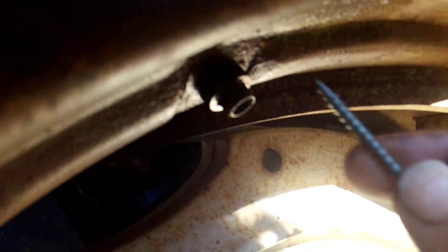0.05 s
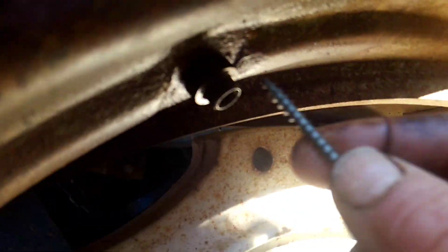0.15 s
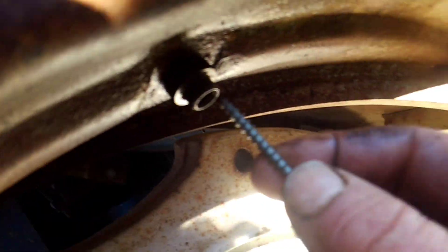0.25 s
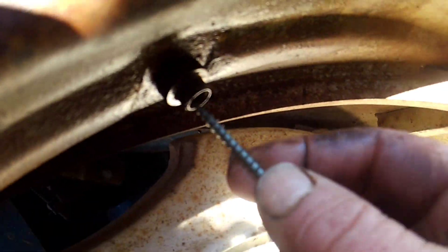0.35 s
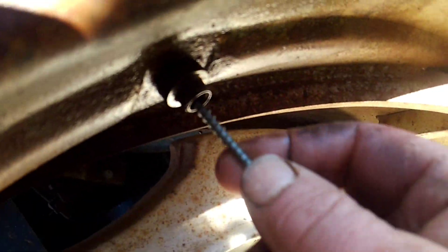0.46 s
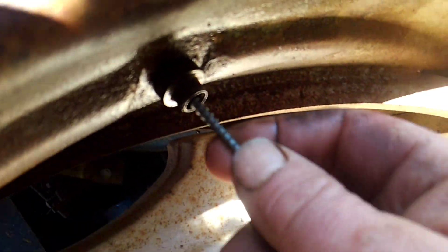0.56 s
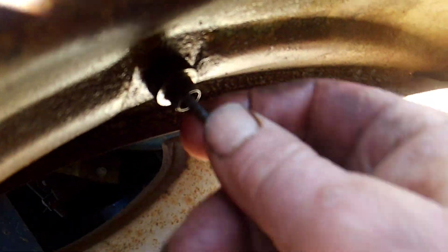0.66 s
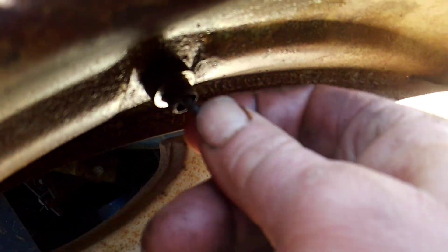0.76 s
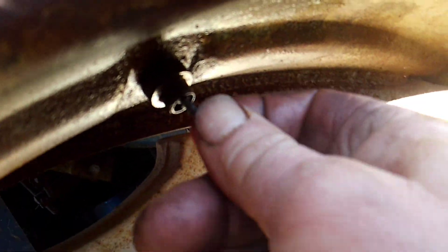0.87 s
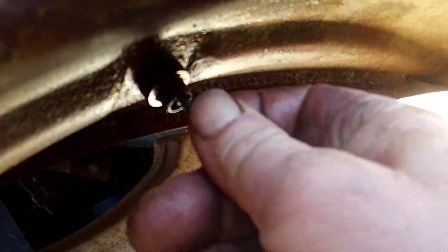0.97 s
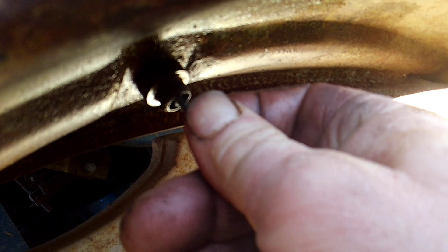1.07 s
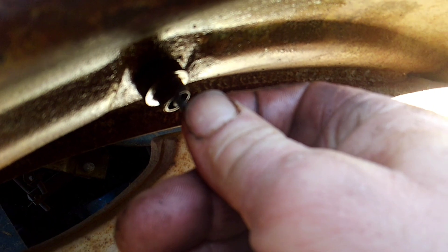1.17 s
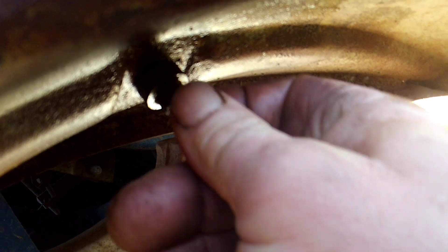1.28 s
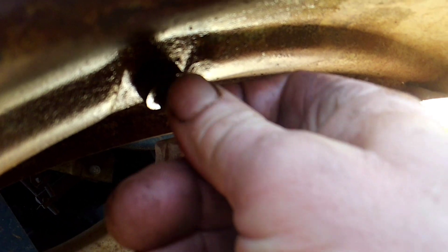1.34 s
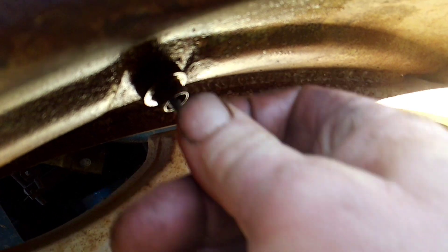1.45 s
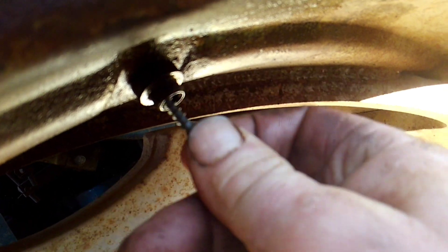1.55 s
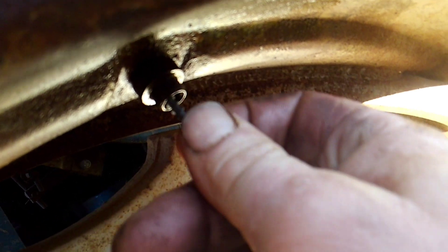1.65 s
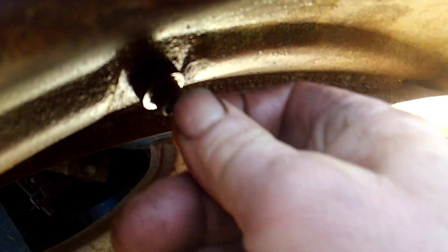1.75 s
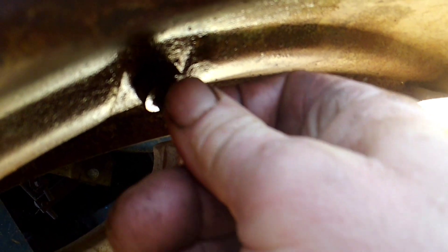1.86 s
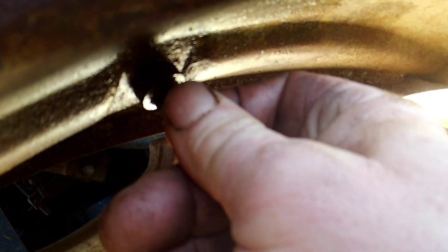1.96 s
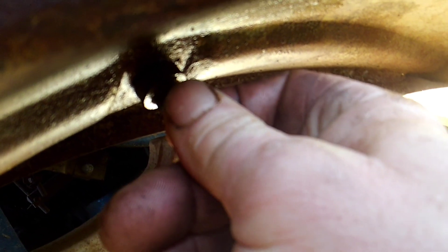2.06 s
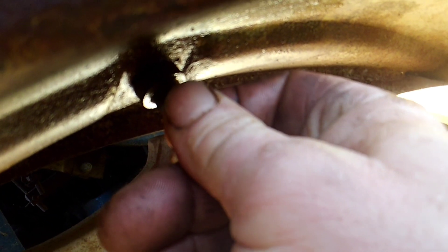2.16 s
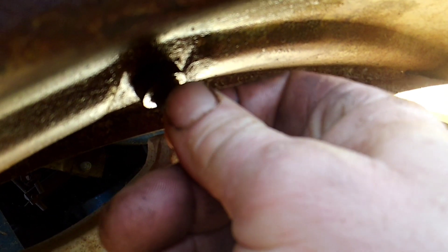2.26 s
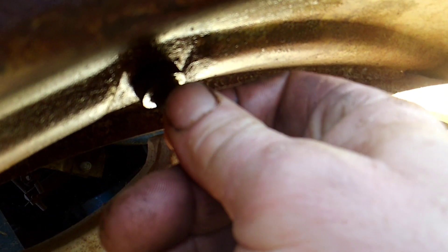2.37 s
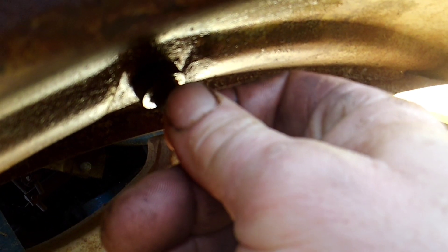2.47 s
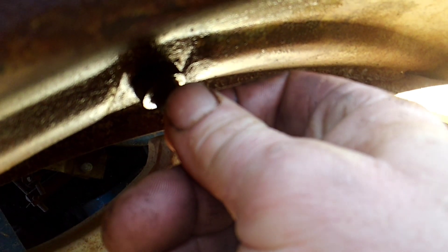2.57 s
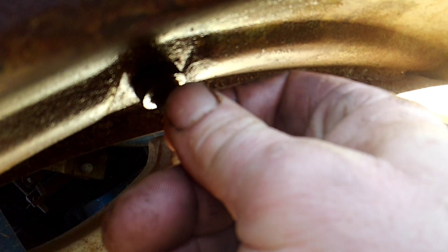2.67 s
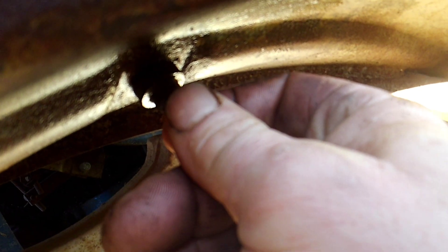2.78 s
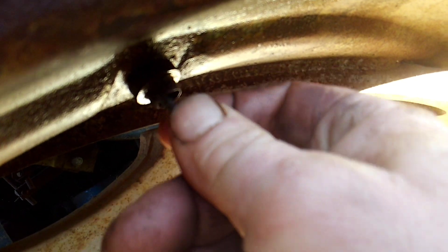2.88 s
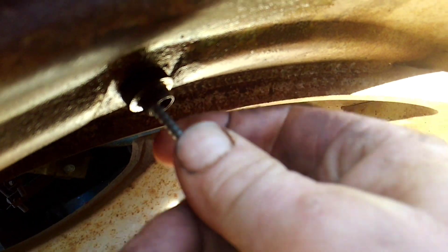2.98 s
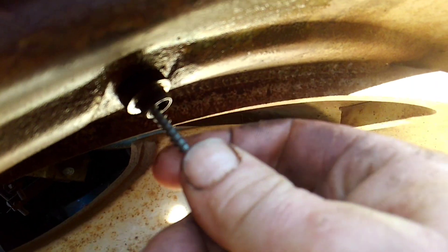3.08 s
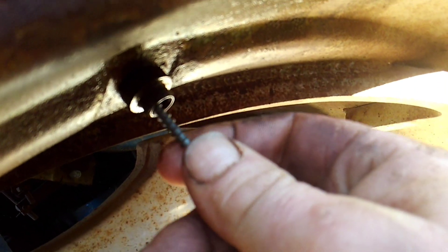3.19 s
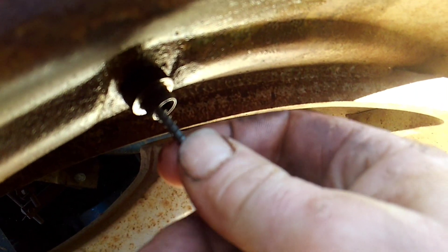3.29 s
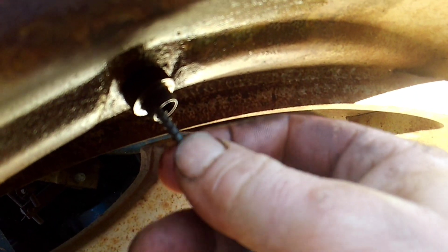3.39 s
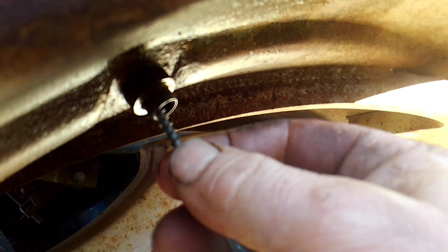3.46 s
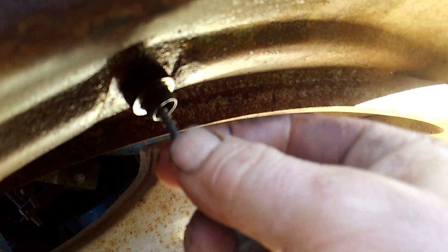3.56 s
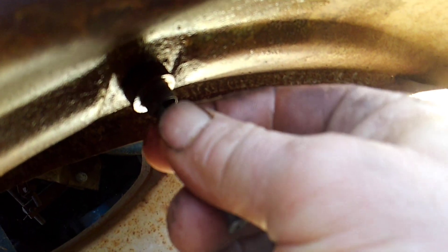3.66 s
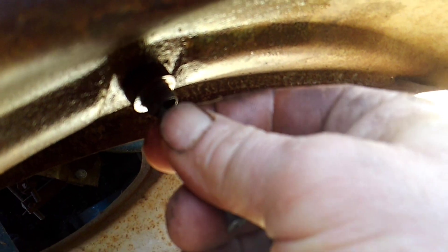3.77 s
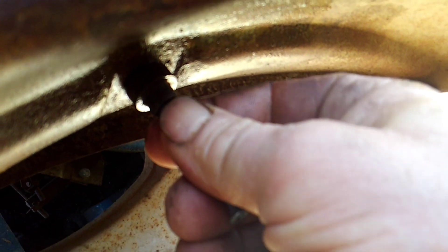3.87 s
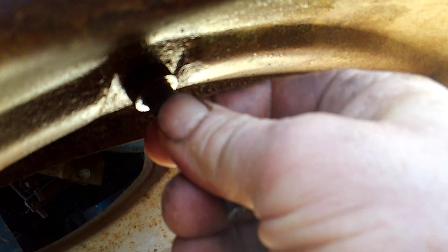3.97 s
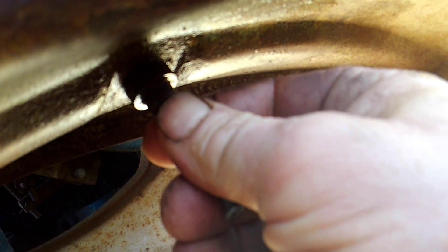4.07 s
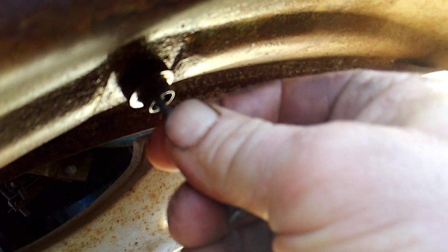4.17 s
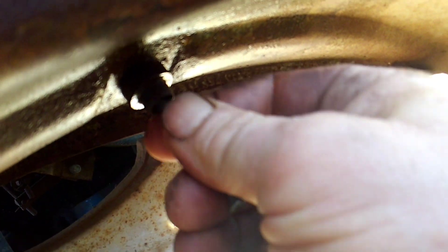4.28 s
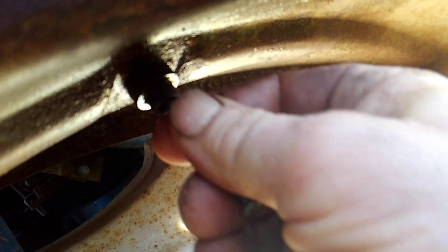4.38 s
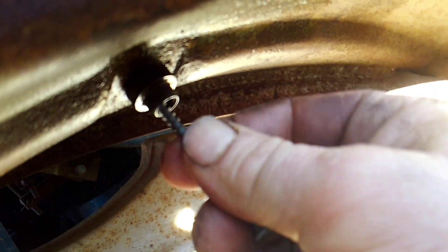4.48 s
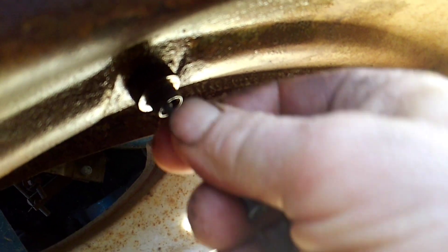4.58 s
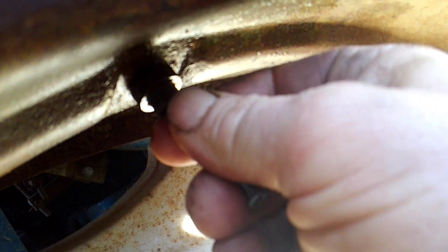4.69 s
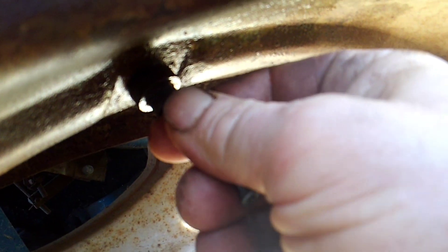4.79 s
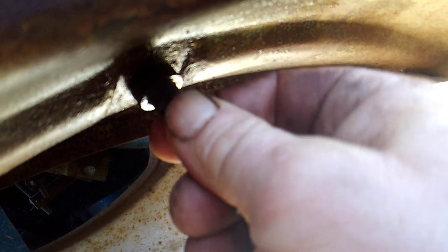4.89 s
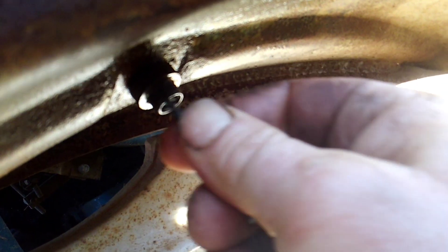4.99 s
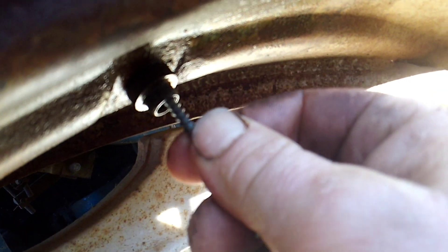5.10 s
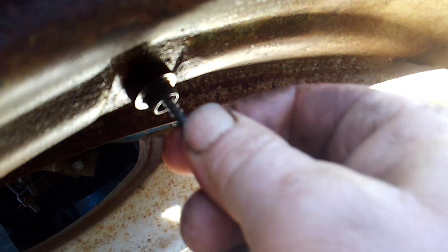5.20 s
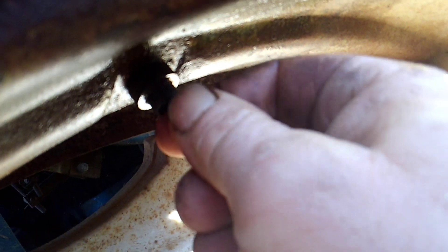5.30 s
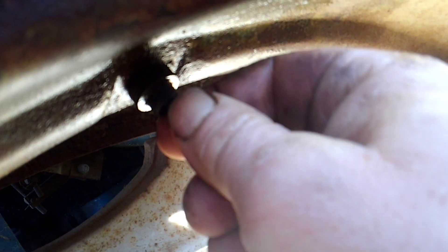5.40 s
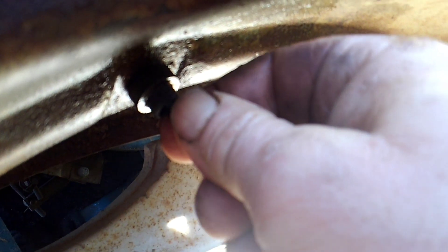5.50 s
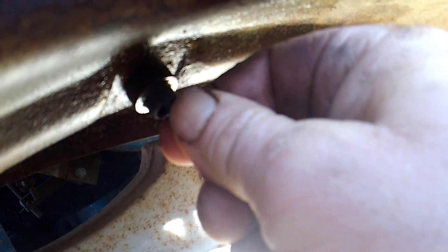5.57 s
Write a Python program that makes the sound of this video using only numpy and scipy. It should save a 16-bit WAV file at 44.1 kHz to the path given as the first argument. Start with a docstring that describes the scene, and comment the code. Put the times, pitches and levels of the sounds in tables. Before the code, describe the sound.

A faint tyre-valve leak hisses, a screw ticks on the stem, then six bursts of pressurised air blast out, the first two squealing.

```python
"""A faint steady leak hisses over low wind rumble; a screw ticks on a tyre valve's stem, then air bursts out.
Six presses of the pin release turbulent jets, synthesized as noise shaped by the stem's resonances.
In the first two the wide-open seal flutters, an unsteady, finally falling squeal of six harmonic partials.
Ticks are impulses through resonators, gusts are decaying swings, and a late faint chirp is a gliding sine.
A single microphone hears it all, so both channels are alike."""
import sys
import numpy as np
from scipy import signal
from scipy.fft import rfft, irfft, next_fast_len
from scipy.io import wavfile

SR = 44100
rng = np.random.default_rng(int(sys.argv[2]) if len(sys.argv) > 2 else 0)


def generate_wav(signal):
    """Clip the signal to [-1, 1] and save it as 16-bit WAV at the path in sys.argv[1]."""
    frames = np.transpose(np.atleast_2d(signal))
    scaled = np.clip(frames, -1, 1) * 32767
    pcm = np.round(scaled).astype(np.int16)
    wavfile.write(sys.argv[1], SR, pcm)


def gain_from_decibels(decibels):
    """Convert decibel values to linear amplitude factors."""
    exponent = np.asarray(decibels, float) / 20
    return 10 ** exponent


N = 248724
FFT_SIZE = next_fast_len(N)
HZ = np.maximum(np.fft.rfftfreq(FFT_SIZE, 1 / SR), 1)

# Presses of the pin: starts to open t/s, starts to shut t/s, rise/s, fall/s
PRESS_TIMES = [(0.708, 1.453, 0.029, 0.005), (1.627, 2.851, 0.032, 0.011), (3.622, 4.094, 0.0071, 0.041),
               (4.24, 4.383, .012, 0.013), (4.578, 4.94, 0.009, 0.041), (5.241, 5.7, 0.0097, .01)]
# Borders between the five spectral regions of jet and leak: f/Hz
REGION_EDGES_HZ = [2800, 4300, 7300, 9700]


def rms_one(x):
    """Normalization: scales a signal to unit root mean square."""
    return x / np.sqrt(np.mean(x ** 2) + 1e-20)


def in_time(rows):
    """Linear interpolation: table columns at every sample, and a gate open from first to last row."""
    s, *columns = np.transpose(rows)
    t = np.arange(N) / SR
    gate = np.clip(np.minimum(t - s[0], s[-1] - t) / 0.004, 0, 1)
    return [np.interp(t, s, column) for column in columns], gate


def spectral_density(points):
    """Spectral envelope: power per Hz, joined in dB over log frequency."""
    hz, db = np.transpose(points)
    return gain_from_decibels(2 * np.interp(np.log(HZ), np.log(hz), db))


def resonance_density(peaks):
    """Resonance: each mode passes a Lorentzian peak of power per Hz."""
    return sum(gain_from_decibels(2 * db) / (1 + (2 * (HZ - hz) / width) ** 2) for hz, width, db in peaks)


def hiss(density):
    """Filtered noise: white noise weighted to a given power per Hz, then brought to unit rms."""
    white = rfft(rng.standard_normal(FFT_SIZE))
    return rms_one(irfft(white * np.sqrt(density), FFT_SIZE)[:N])


def drift(rate_hz):
    """Low-pass random fluctuation: slow noise of unit rms, drawn at every 16th sample."""
    step = 16
    size = next_fast_len(N // step + 2)
    hz = np.fft.rfftfreq(size, step / SR)
    slow = irfft(rfft(rng.standard_normal(size)) / (1 + (hz / rate_hz) ** 2), size)
    return np.interp(np.arange(N) / step, np.arange(size), rms_one(slow))


def jet(beat, flow, pop):
    """Turbulent jet noise: broadband eddies excite the stem, whose rings swell and fade as the pin moves."""
    # Stem colour for five positions of the screw: f/Hz, relative level/dB per Hz
    jet_colours = [
        [(1060, -52), (1800, -17.5), (2560, -4), (3070, -1.5), (3580, 3), (5720, -0.5), (6790, -6),
         (8290, -9.5), (8990, -0.5), (9750, -14), (10500, -1.5), (11700, -13), (12700, -6), (15600, -13.5)],
        [(1060, -27), (1800, -15.5), (2330, -14), (2620, -12.5), (3080, -10.5), (4130, -0.5), (5350, 4),
         (6810, -4), (11500, -13), (15200, -18)],
        [(1060, -34), (1800, -12.5), (2200, -3.5), (3010, -2), (3540, 5.5), (4320, -3), (4650, -11.5),
         (5420, -8), (7570, -7.5), (8070, -11), (8670, -5), (9580, -13.5), (11600, -8), (15600, -17)],
        [(1060, -40), (1800, -15), (2280, -8), (2880, -6.5), (3510, 2.5), (4690, -6), (5420, 1.5), (6040, -3),
         (7110, 2), (7850, -4), (8520, -2), (10000, -14), (11500, -7), (15600, -19)],
        [(1060, -43), (1800, -25), (2200, -15.5), (2510, -14.5), (2780, -7), (3610, 2), (4290, -3), (4650, -6),
         (5570, -1), (7850, -10.5), (8440, -8), (9660, -23.5), (11100, -20), (15600, -20.5)],
    ]
    # Narrow high rings of the stem at those positions: f/Hz, width/Hz, relative level/dB
    stem_rings = [
        [(12000, 390, -5)],
        [(10140, 270, -29)],
        [(5400, 300, -3), (7730, 180, -8), (11300, 250, -4), (13800, 300, -6)],
        [(8400, 210, -15), (11400, 250, -10), (13600, 240, -7)],
        [(8440, 220, -10), (11100, 250, -17), (13400, 300, -19)],
    ]
    # Low roar of the jet: f/Hz, relative level/dB per Hz
    roar_colour = [(120, -28), (200, -13), (488, -8), (570, -5.5), (929, -1), (1090, -7), (1800, -1.5),
                   (2340, -24), (3960, -120)]
    # Opening of the pin, press by press: t/s, main hump level/dB, treble level/dB
    pin_opening = [
        [(0.74, -25.5, -30), (0.798, -35, -36), (0.846, -26.5, -25), (0.97, -21.5, -25), (1.03, -24.5, -26.5),
         (1.12, -33.5, -39), (1.168, -26, -26.5), (1.238, -19, -24.5), (1.262, -23, -26.5), (1.364, -21.5, -26),
         (1.445, -18, -24.5)],
        [(1.665, -29.5, -27.5), (1.719, -20.5, -26.5), (1.757, -20.5, -25.5), (2.677, -20.5, -24.5),
         (2.845, -20, -24)],
        [(3.635, -33, -30), (3.645, -33, -34), (3.687, -28.5, -25.5), (3.759, -31.5, -32.5), (3.799, -32, -30),
         (3.837, -24.5, -24), (3.865, -26.5, -28), (3.939, -24.5, -27), (4.047, -24, -29), (4.095, -34.5, -37)],
        [(4.255, -30, -33), (4.273, -26.5, -30), (4.295, -19, -27.5), (4.375, -21.5, -28.5)],
        [(4.592, -25, -28), (4.608, -33, -30), (4.622, -24, -32.5), (4.858, -23, -30), (4.91, -28.5, -27),
         (4.926, -24.5, -30), (4.935, -31.5, -29.5)],
        [(5.255, -27, -23.5), (5.275, -23.5, -26.5), (5.563, -26.5, -32.5), (5.635, -27, -28)],
    ]
    # Levels at half opening: main hump level/dB, treble level/dB
    half_open_db = (-25, -29)
    # How skirt, roar, low ring and high ring follow: share of the hump's swing, share of the treble's
    follow_shares = [(0.24, 0.38), (0.29, 0.53), (-0.33, 0.08), (-0.0058, 0.43)]
    # Shifts of the screw: t/s, level/dB at half opening of skirt, roar, low ring and high ring,
    # trend of the roar/(dB/s)
    screw_shifts = [(0.7, -32.5, -43, -28, -28.5, -1), (1.198, -33, -44.5, -24, -29.5, .1),
                    (1.6, -33.5, -43.5, -24.5, -28, .1), (1.758, -36, -42.5, -24.5, -30, -3),
                    (3.6, -35.5, -43, -28, -29, .1), (3.698, -33.5, -49, -26.5, -31.5, 6),
                    (4.2, -33.5, -40.5, -24.5, -29.5, .1), (4.288, -35, -43.5, -23, -28.5, -2),
                    (4.55, -34.5, -42.5, -27, -30.5, -23), (5.2, -35, -49, -26.5, -30.5, -22)]
    # Stem position (index of the colour) after each shift
    positions = [0, 1, 0, 1, 2, 2, 0, 1, 3, 4]
    pop_db, patchy_db, eddy_db, surge_db, chop = 3.5, 0.82, 0.5, 0.5, 0.05

    region, out, t = np.digitize(HZ, REGION_EDGES_HZ), np.zeros(N), np.arange(N) / SR
    patches = [gain_from_decibels(patchy_db * drift(10.7)) for k in range(5)]  # each region flickers by itself
    airs = []
    for colour, rings in zip(jet_colours, stem_rings):
        density = spectral_density(colour) + resonance_density(rings)
        airs.append([patches[k] * hiss(density * (region == k)) for k in range(5)])
    roar = hiss(spectral_density(roar_colour))
    popping = gain_from_decibels(pop_db * pop)  # the rings overshoot as the pin gives way

    (hump_db, top_db), _ = in_time(np.vstack(pin_opening))
    departure_db = np.array([hump_db, top_db]).T - half_open_db
    swings = gain_from_decibels(np.array(follow_shares) @ departure_db.T)
    ends = [row[0] + 0.004 for row in screw_shifts[1:]] + [N / SR + 1]  # 4 ms crossfades
    for (s, *dbs, trend_db), end, place in zip(screw_shifts, ends, positions):
        _, gate = in_time([(s,), (end,)])
        at = slice(int(s * SR), int(end * SR))
        skirt, low, hump, high, top = (band[at] for band in airs[place])
        trending_roar = roar[at] * gain_from_decibels(trend_db * (t[at] - s))
        parts = (skirt, trending_roar, low * popping[at], high * popping[at])
        air = gain_from_decibels(hump_db[at]) * hump + gain_from_decibels(top_db[at]) * top
        for db, swing, part in zip(dbs, swings, parts):
            air = air + gain_from_decibels(db) * swing[at] * part
        out[at] += np.sqrt(gate[at]) * air
    eddies = gain_from_decibels(eddy_db * drift(500.0) + surge_db * drift(44.0))  # eddies burst unevenly
    return flow * out * rms_one(eddies) * (1 + chop * beat)


def presses():
    """Valve flow control: gain of the flow, pop at each opening, and what lingers after each shutting."""
    edge_db, pop_s, afterflow_s = 25, 0.029, 0.11  # the edges span edge_db; the times are decay constants
    t, flow, pop, after = np.arange(N) / SR, np.zeros(N), np.zeros(N), np.zeros(N)
    for opens, shuts, rise, fall in PRESS_TIMES:
        edge = np.minimum(np.minimum((t - opens) / rise, 1 - (t - shuts) / fall), 1)
        flow += (edge > 0) * gain_from_decibels(edge_db * (np.maximum(edge, 0) - 1))
        pop += (t > opens) * np.exp(-np.clip(t - opens - rise, 0, None) / pop_s)
        after += (t > shuts) * np.exp(-np.clip(t - shuts, 0, None) / afterflow_s)
    return flow, pop, after


def flutter():
    """Self-excited oscillation: the slapping seal gives six partials, and a beat that chops the flow."""
    # Two squeals: t/s, pitch f/Hz, relative level/dB, overtone slope/(dB per partial)
    squeals = [
        [(1.228, 539, -32, -7), (1.25, 506.5, -31, -3), (1.29, 618, -30.5, -5), (1.306, 614, -30.5, -10),
         (1.333, 721.7, -34, -1), (1.37, 519, -35.5, -7), (1.414, 504, -28, -8), (1.458, 372, -33.5, -4)],
        [(1.765, 608, -33, -4), (1.783, 583, -29, -6), (1.809, 641, -30, -5), (1.867, 572, -32, -5.5),
         (1.885, 529.5, -29.5, -3), (1.939, 538, -29.5, -2.5), (1.997, 474, -29, -2), (2.135, 424.7, -32.5, -2),
         (2.207, 442.3, -31, -3), (2.5, 400.3, -33.5, -2), (2.715, 372, -30, -3), (2.739, 331.6, -33, -2),
         (2.8, 282.5, -31, -4), (2.85, 253.4, -43, -4.5)],
    ]
    # Ring of stem and hand: f/Hz, level/dB
    ring_colour = [(250, -15.5), (340, -6), (380, -1.5), (550, 1), (700, -0.5), (900, -10), (1100, -12.5),
                   (1350, -1), (1700, -2), (2100, 0), (2700, -5), (4300, -14)]
    fade_s = 0.015
    t = np.arange(N) / SR
    hz, level, slope = np.full(N, 300.0), np.zeros(N), np.zeros(N)
    for rows in squeals:
        (pitch, db, slope_db), gate = in_time(rows)
        hz = np.where(gate > 0, pitch, hz)
        slope = np.where(gate > 0, slope_db, slope)
        level += gain_from_decibels(db) * np.clip(np.minimum(t - rows[0][0], rows[-1][0] - t) / fade_s, 0, 1)
    jitter = 1 + 0.0103 * drift(79.0) + 0.009 * drift(12.1)
    phase = 2 * np.pi * np.cumsum(hz * jitter) / SR
    ring_hz, ring_db = np.transpose(ring_colour)
    tone = np.zeros(N)
    for k in range(6):
        ring = np.interp(np.log((k + 1) * hz), np.log(ring_hz), ring_db)
        flicker = (1.1 + 0.57 * k) * drift(26.0)  # higher partials waver more
        tone += np.sqrt(2) * level * np.sin((k + 1) * phase) * gain_from_decibels(slope * k + ring + flicker)
    return tone, (level > 0) * np.cos(phase)


def leak(after):
    """Leakage noise and acoustic filtering: the valve never quite seals, and the near hand colours its hiss."""
    # Colour with hand away, nearing, cupped round the stem, pressed close: f/Hz, relative level/dB per Hz
    leak_colours = [
        [(180, -42), (300, -20), (864, -18), (1090, -17), (1200, -21), (2150, -13), (2450, -28), (3090, -7),
         (4090, -11.5), (4510, -2), (5600, -11), (6600, -2.5), (7920, -13.5), (12200, -6.5), (15600, -12.5)],
        [(200, -37), (320, -14), (770, -14.5), (1200, -17.5), (2500, -15.5), (3900, -10), (5600, -8.5),
         (6600, -5.5), (7700, -10), (9300, -12), (10500, -8), (13200, -12), (14300, -10), (15500, -11.5)],
        [(200, -30), (320, -12.5), (1100, -14.5), (2500, -11), (4400, -2.5), (5580, -1.5), (6200, -11),
         (7200, -7.5), (8900, -12.5), (10700, -7), (11500, -9), (13800, -9), (14500, -12), (15500, -14)],
        [(200, -35), (320, -15.5), (900, -9), (1500, -9), (2400, -7.5), (4200, 2.5), (5900, 0), (6600, -5.5),
         (8500, -5.5), (11600, -6), (13000, -7), (15500, -4.5)],
    ]
    # Narrow rings in those four states: f/Hz, width/Hz, relative level/dB
    leak_rings = [
        [(2550, 54, -6.5)],
        [(2210, 48, -5), (4540, 470, 1.5), (12200, 900, -12)],
        [(12780, 1000, -9), (1660, 29, -6.5)],
        [(2030, 80, 0), (5300, 120, 6)],
    ]
    # Leak in those four states: level/dB
    leak_levels = [-38, -37.5, -40.5, -40.5]
    # Borders of the four hand states: t/s
    hand_moves = [0, .22, 1.0, 3.9, 6]
    afterflow_db, sway_db = 4.5, 0.8
    airs = []
    for db, colour, rings in zip(leak_levels, leak_colours, leak_rings):
        airs.append(gain_from_decibels(db) * hiss(spectral_density(colour) + resonance_density(rings)))
    hand = np.digitize(np.arange(N) / SR, hand_moves) - 1
    spectrum = rfft(np.choose(hand, airs), FFT_SIZE)
    region = np.digitize(HZ, REGION_EDGES_HZ)
    swaying = np.zeros(N)
    for k in range(5):  # each region of the hiss sways at random by itself
        band = irfft(spectrum * (region == k), FFT_SIZE)[:N]
        swaying += gain_from_decibels(sway_db * drift(20.0)) * band
    return gain_from_decibels(afterflow_db * after) * swaying  # the seal settles after each press


def ticks():
    """Impact excitation: each touch is a click with a short gritty tail, rung through the screw's modes."""
    # Touches of screw on stem: t/s, relative level/dB
    touches = [(0.434, -31.5), (0.4582, -26.5), (0.492, -30.5), (0.5268, -22.5), (0.656, -17.5),
               (0.666, -22.5), (0.6804, -29), (4.611, -15.5)]
    # Short rings of the screw: f/Hz, width/Hz, relative level/dB
    screw_modes = [(1530, 1930, 2.5), (2800, 530, -2.5), (4300, 1040, 1), (6060, 1000, -7)]
    tail_s = 0.007
    t = np.arange(int(0.05 * SR)) / SR
    force = np.zeros(N)
    for s, db in touches:
        touch = 0.2 * rng.standard_normal(len(t)) * np.exp(-t / tail_s)
        touch[0] = 1
        start = round(s * SR)
        force[start:start + len(t)] += gain_from_decibels(db) * touch
    force += 1e-18
    band = signal.butter(2, [900, 8000], "band", fs=SR, output="sos")
    out = gain_from_decibels(-11.0) * signal.sosfilt(band, force)
    for k, (hz, width, db) in enumerate(screw_modes):
        r = np.exp(-np.pi * width / SR)  # pole radius
        poles = [1, -2 * r * np.cos(2 * np.pi * hz / SR), r * r]
        out += (-1) ** k * gain_from_decibels(db) * signal.lfilter([1, 0, -1], poles, force)
    return gain_from_decibels(-7.0) * out


def chirp():
    """Amplitude modulation: random modulation spreads a faint falling sine into a thin breathy whistle."""
    # Falling whistle: t/s, f/Hz, level/dB before modulation
    glide = [(5.03, 3620, -50), (5.05, 3350, -42), (5.066, 2930, -41), (5.092, 2800, -43)]
    (hz, db), gate = in_time(glide)
    breath = 1 + 0.56 * drift(150.0)
    return gate * gain_from_decibels(db) * breath * np.sin(2 * np.pi * np.cumsum(hz) / SR)


def buffet():
    """Flow-induced pressure noise: air rolls over the port; gusts set the diaphragm swinging with a rasp."""
    # Rumble: f/Hz, relative level/dB per Hz
    rumble_colour = [(12, -45), (20, -60), (41, -2), (65, -3.5), (127, -9.5), (278, -17.5), (478, -20),
                     (520, -25), (600, -28), (780, -63.5), (1320, -120)]
    # Gusts that hit the port: t/s, relative level/dB, final f/Hz, 60 dB decay time/s
    thumps = [(1.23, -35, 120, 0.034), (1.342, -26.5, 95.5, 0.043), (1.469, -31, 48.7, 0.073),
              (1.489, -31, 119, 0.042), (1.508, -22.5, 67, 0.061), (2.867, -25.5, 121.1, 0.037),
              (2.884, -24, 89, 0.037), (2.894, -26, 63.8, 0.086), (2.998, -35.5, 101.7, 0.16),
              (3.021, -24, 71.5, 0.041), (4.326, -34, 80, 0.05), (4.362, -15, 105, 0.036),
              (4.386, -28, 58.5, 0.056), (4.428, -28, 63, 0.061)]
    rasp_db = -22.5  # relative to the swing
    out = rumble_level() * gain_from_decibels(2.0 * drift(12.0)) * hiss(spectral_density(rumble_colour))
    t = np.arange(SR // 4) / SR
    rasp = hiss((HZ > 150) / (1 + (HZ / 350) ** 8))
    for s, db, hz, t60 in thumps:
        start = round(s * SR)
        at = slice(start, start + len(t))
        sagging_time = t + 0.0031 * (1 - np.exp(-t / 0.0027))  # pitch starts high and sags
        swing = -np.sin(2 * np.pi * hz * sagging_time)
        envelope = gain_from_decibels(db + 13.5 - 60 * t / t60) * np.minimum(t / 0.0071, 1) ** 2
        out[at] += envelope * (swing + gain_from_decibels(rasp_db) * rasp[at])
    return signal.sosfilt(signal.butter(4, 40, "high", fs=SR, output="sos"), out)


def rumble_level():
    """Power addition: a calm level that sinks while the jet blows, joined by a few swelling gusts."""
    # Swells of the rumble: peak t/s, relative level/dB, rise constant/s, fall constant/s
    swells = [(0.55, -45, .08, 0.083), (1.43, -40, 0.092, 0.17), (2.87, -43, 0.063, .12),
              (4.35, -31.5, 0.025, 0.058), (4.55, -43, .1, 0.066)]
    calm_db, sink_db, sink_s, return_s = -49, -14, 0.15, 0.024
    t, sunk, gusts = np.arange(N) / SR, np.zeros(N), np.zeros(N)
    for opens, shuts, *_ in PRESS_TIMES:
        sunk += np.clip(np.minimum((t - opens) / sink_s, 1 - (t - shuts) / return_s), 0, 1)
    for s, db, rise, fall in swells:
        gusts += gain_from_decibels(db) * np.exp(np.where(t < s, (t - s) / rise, (s - t) / fall))
    return np.hypot(gain_from_decibels(calm_db + sink_db * sunk), gusts)


def scene():
    """Superposition: the pressures of all sources add at one microphone."""
    tone, beat = flutter()
    flow, pop, after = presses()
    leak_share = 1 - 0.6 * flow  # the open jet takes over part of the leak
    mono = jet(beat, flow, pop) + tone + leak(after) * leak_share + ticks() + chirp() + buffet()
    return np.array([mono, mono])


def top_cut(x):
    """Nothing passes above the cut-off."""
    return signal.sosfilt(signal.butter(12, 15840, fs=SR, output="sos"), x)


def record(dry):
    """Direct pickup: the microphone mix passes on with no room or gain added."""
    return top_cut(dry)


dry = scene()
out = record(dry)
generate_wav(out)
```